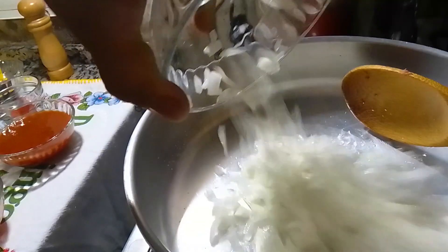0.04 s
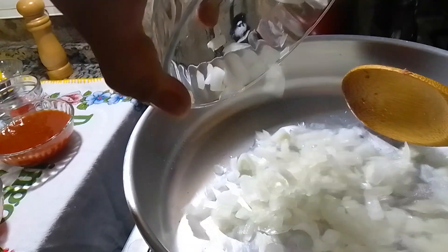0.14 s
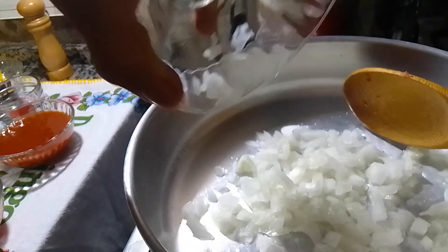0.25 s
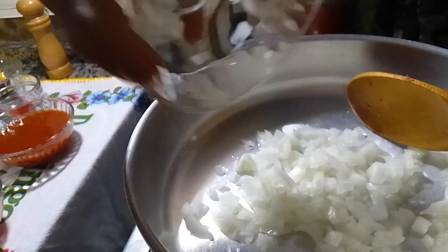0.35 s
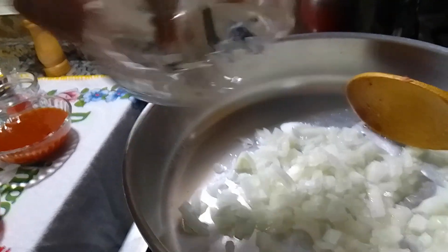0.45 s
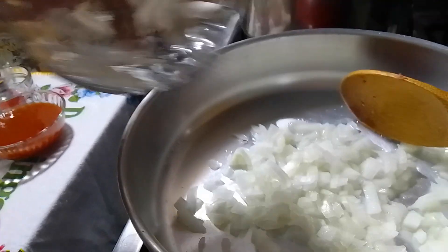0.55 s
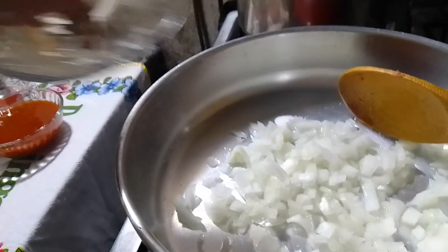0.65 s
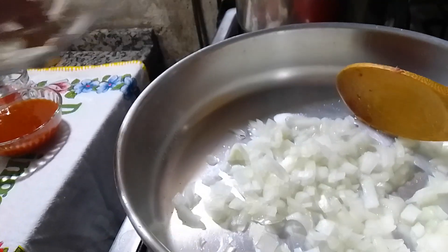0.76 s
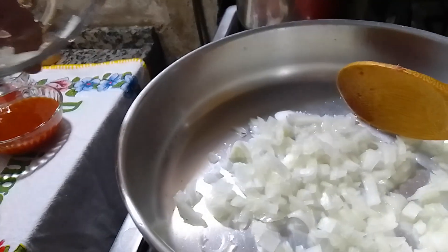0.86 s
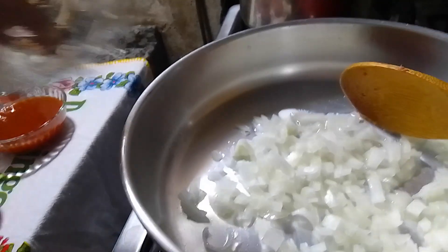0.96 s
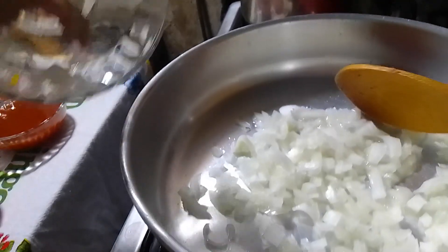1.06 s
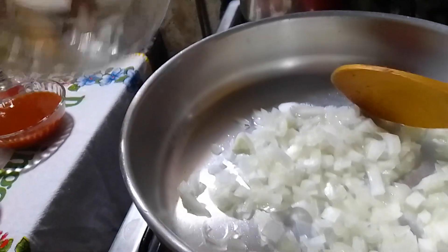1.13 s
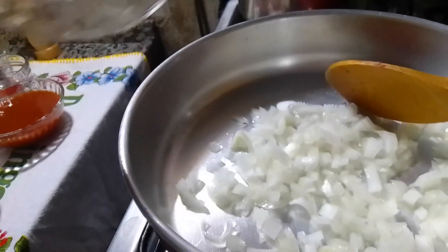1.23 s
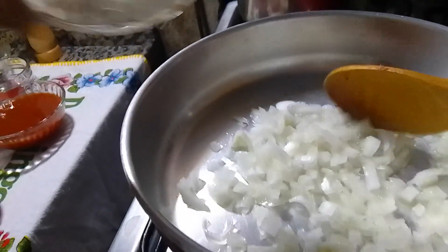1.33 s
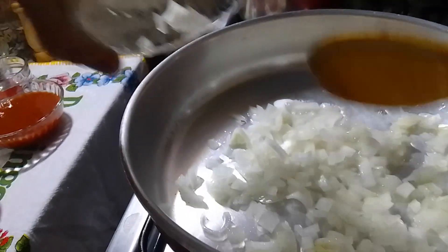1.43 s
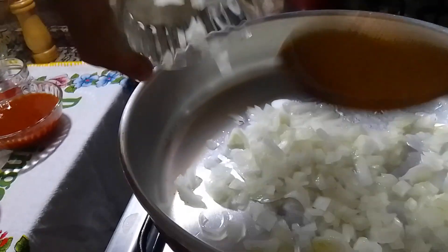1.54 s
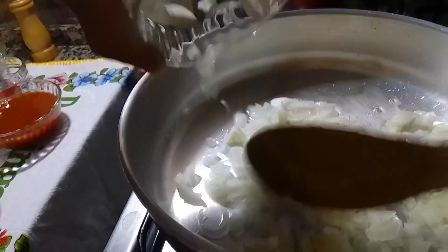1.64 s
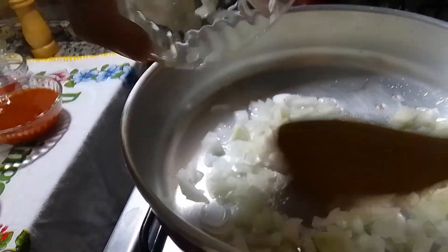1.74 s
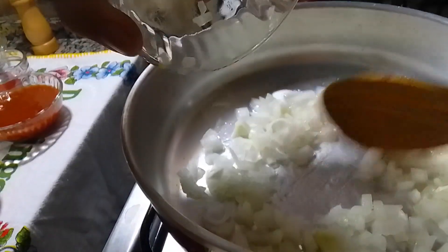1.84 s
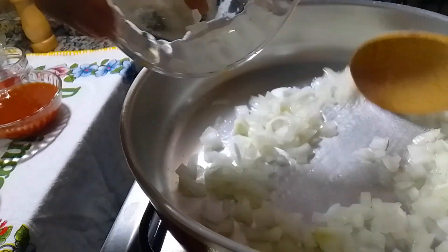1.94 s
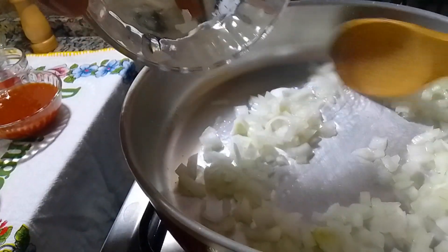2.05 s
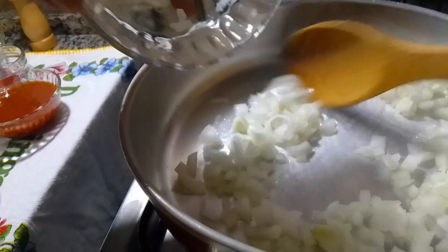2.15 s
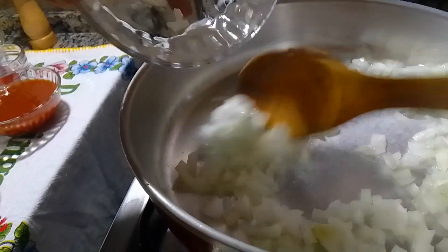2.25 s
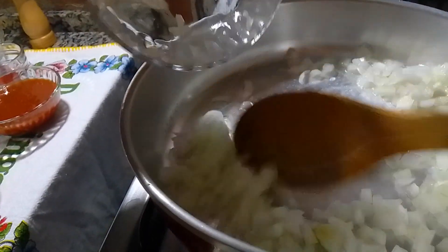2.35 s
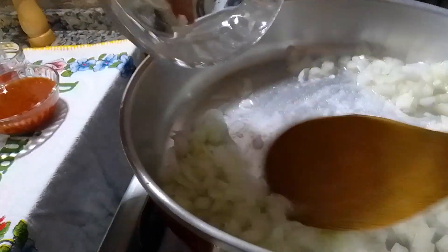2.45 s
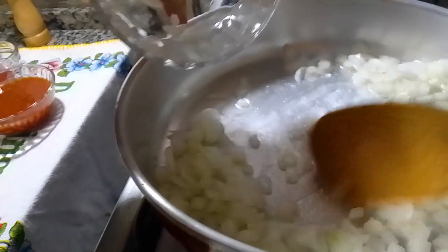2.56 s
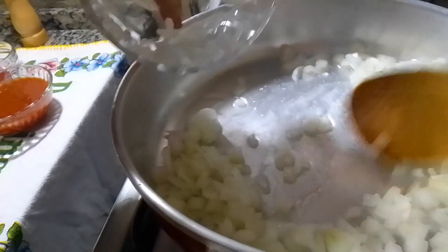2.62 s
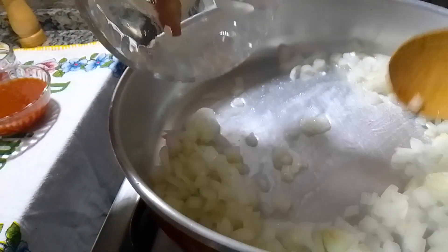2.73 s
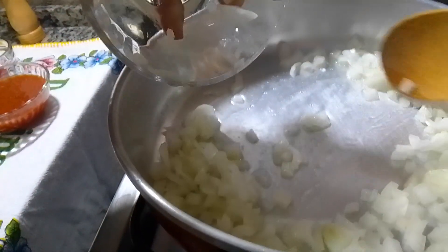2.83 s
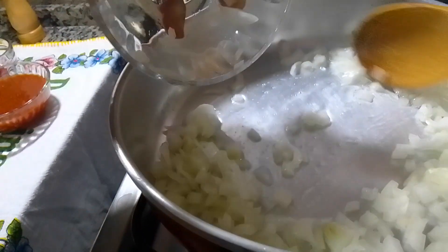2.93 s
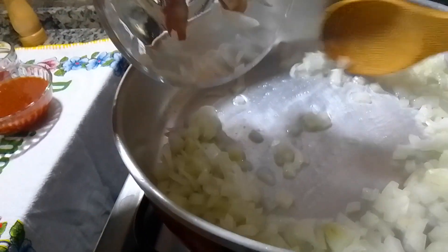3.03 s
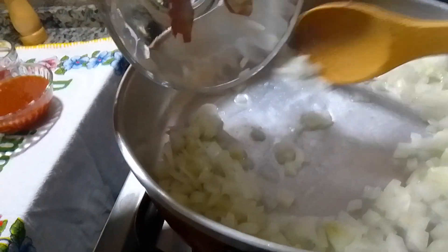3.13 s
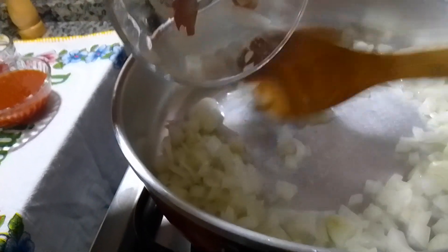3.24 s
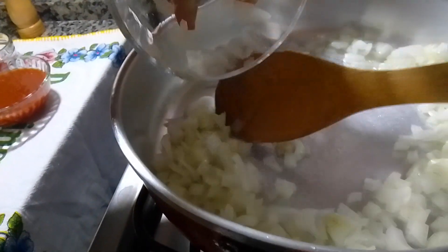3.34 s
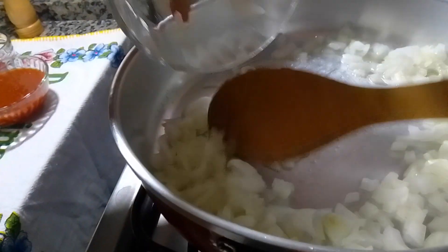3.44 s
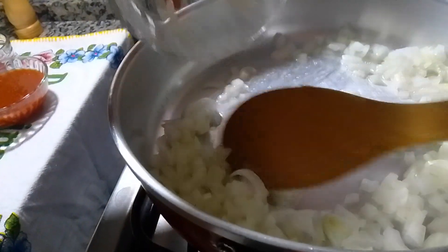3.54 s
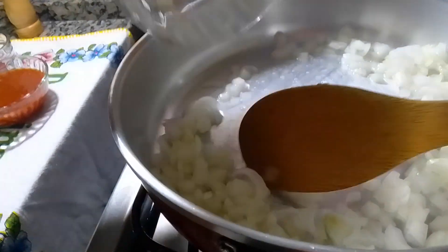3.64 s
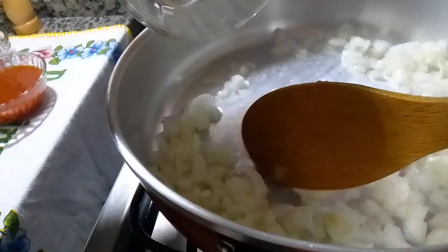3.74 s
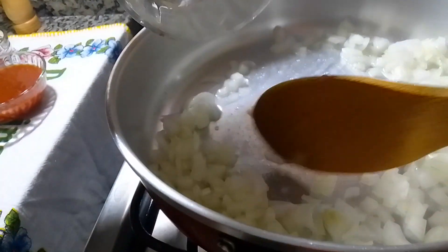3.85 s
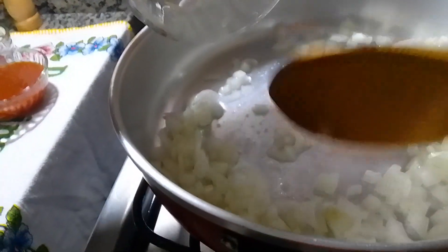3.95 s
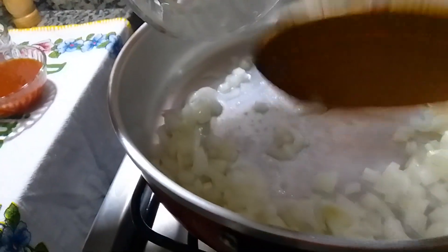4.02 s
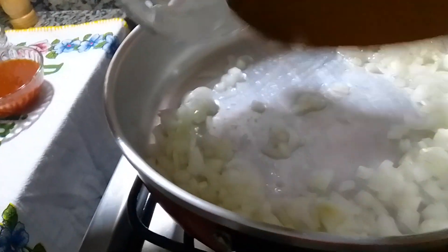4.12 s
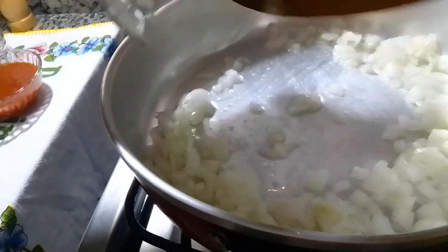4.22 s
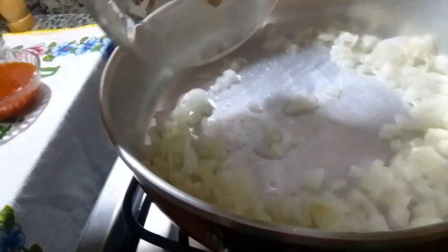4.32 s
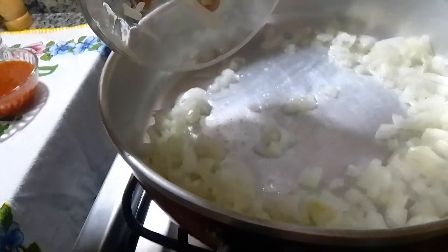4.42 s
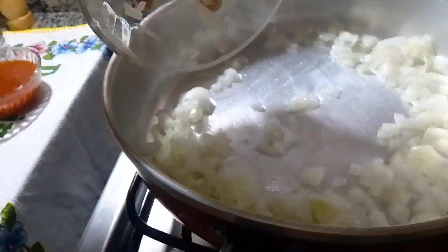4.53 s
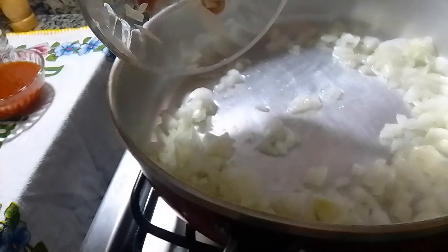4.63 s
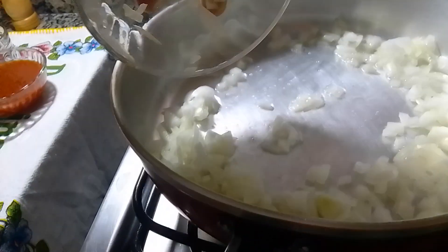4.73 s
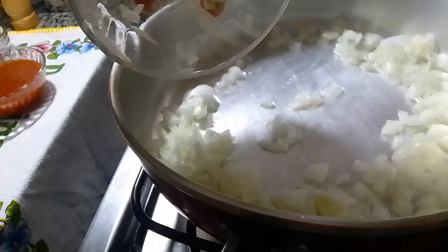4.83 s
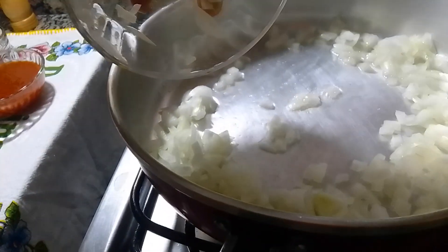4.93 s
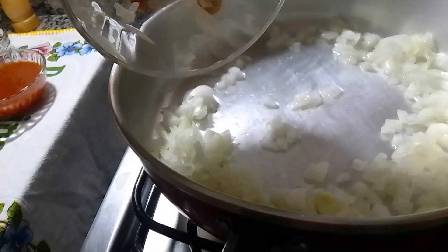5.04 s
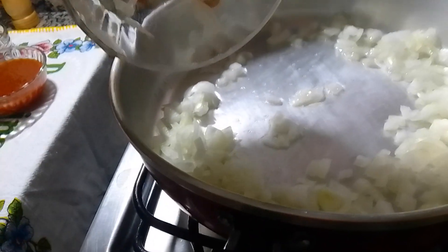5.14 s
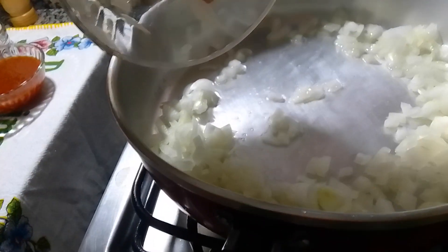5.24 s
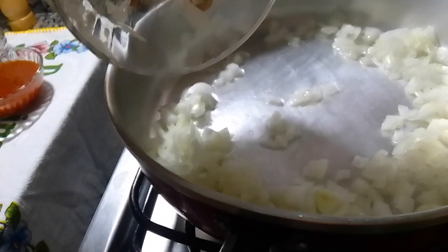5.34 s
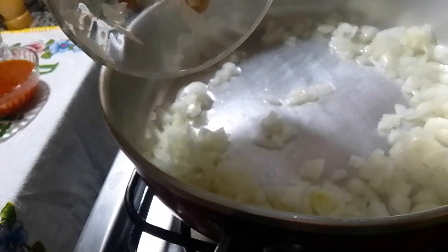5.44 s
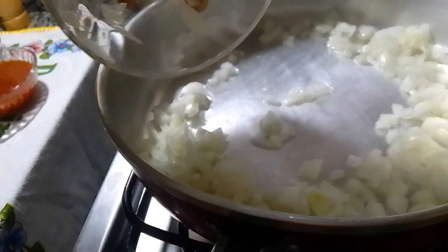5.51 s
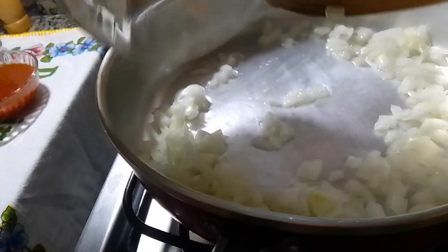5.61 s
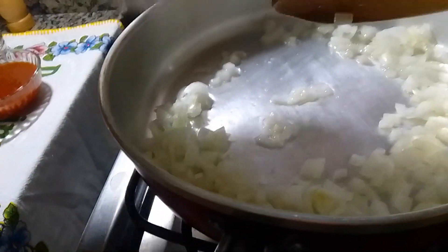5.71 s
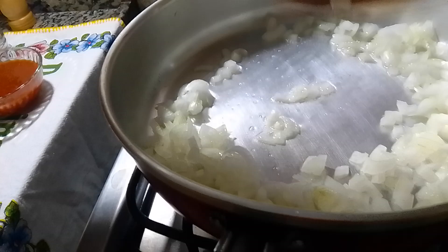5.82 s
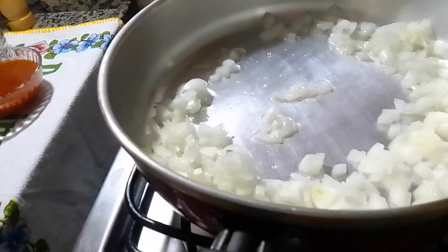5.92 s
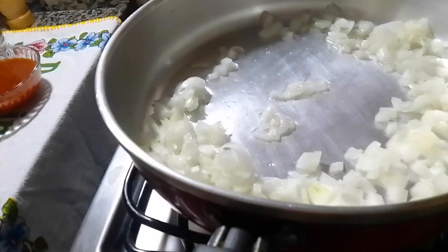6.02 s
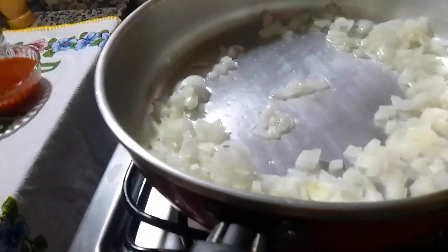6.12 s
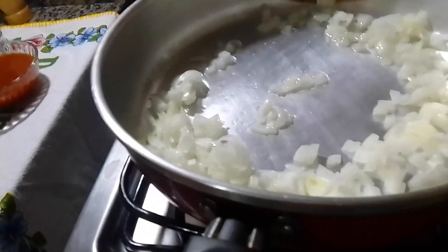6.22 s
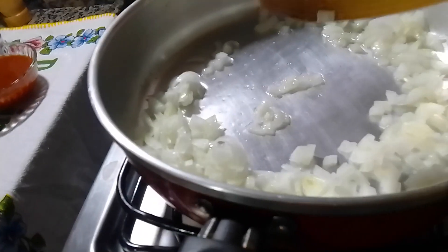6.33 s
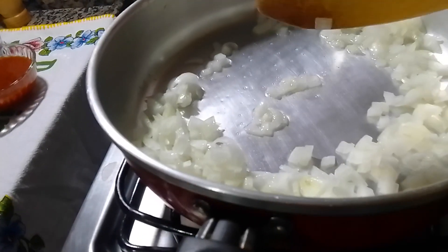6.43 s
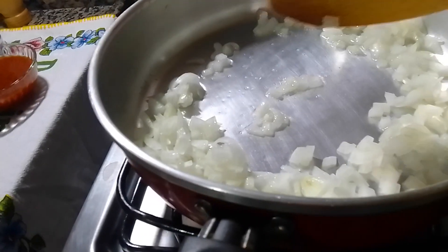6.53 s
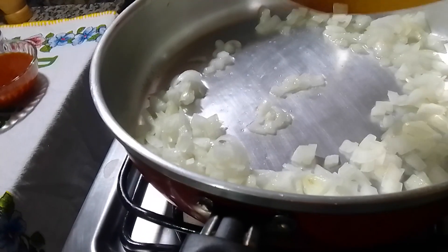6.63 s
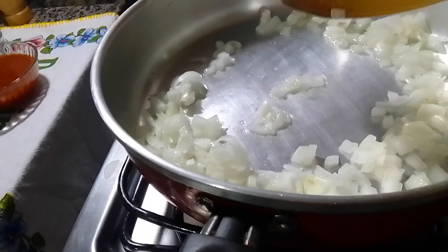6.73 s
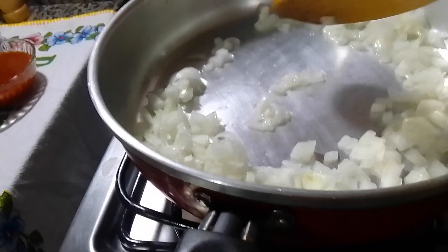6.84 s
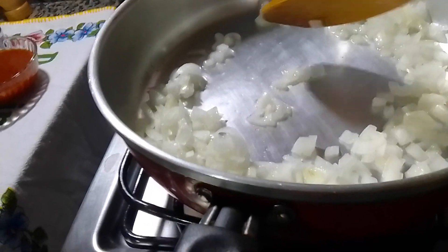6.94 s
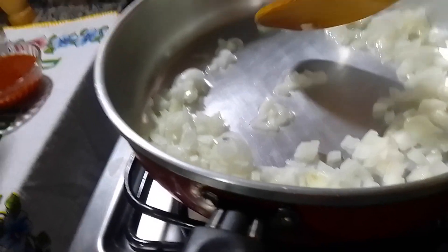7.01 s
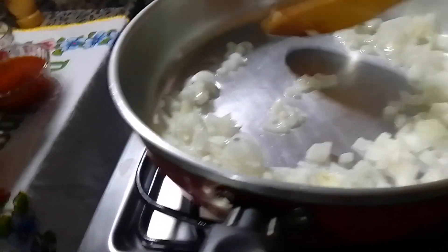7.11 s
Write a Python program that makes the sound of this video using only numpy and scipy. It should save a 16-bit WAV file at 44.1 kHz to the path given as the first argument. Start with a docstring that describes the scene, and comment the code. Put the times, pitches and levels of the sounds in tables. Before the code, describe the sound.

A close, bright sizzle of onion in a frying pan flares as a wooden spoon knocks and stirs, then fades to crackling.

```python
"""Chopped onion is tipped from a glass bowl into hot oil in a steel frying pan, close to a mono microphone.
First the bowl and onion knock on the pan, and countless tiny steam bursts start to sizzle.
Wet pieces plop, and the sizzle flares up as a wooden spoon knocks on the pan and spreads the onion.
Then kitchenware clacks once, and the frying eases off into single pops.
All along, a small kitchen answers with a short echo."""
import sys
import numpy as np
from scipy import signal
from scipy.fft import rfft, irfft, next_fast_len
from scipy.io import wavfile
from scipy.ndimage import uniform_filter1d, minimum_filter1d, map_coordinates

SR = 44100
rng = np.random.default_rng(int(sys.argv[2]) if len(sys.argv) > 2 else 0)


def dump_mix(stems):
    """Bounce the given channels to the path in sys.argv[1] as a 16-bit WAV at rate SR."""
    frames = np.atleast_2d(stems).T  # one column per channel
    limited = np.clip(frames, -1, 1)  # hard clip at full scale
    pcm = np.round(limited * 32767).astype(np.int16)
    wavfile.write(sys.argv[1], SR, pcm)


N = 316195

# tone colour of the fine sizzle, including the microphone's bright peak near 9 kHz: pitch_hz, level_db
FINE_COLOUR = [(2500, -64), (4500, -24.5), (5600, -18.5), (6800, -10.5), (7800, -5.5), (8800, 0),
               (9700, -1.5), (11000, -7.5), (12800, -12), (15500, -14.5)]
# tone colours of coarse bursts and of bubbles: pitch_hz, level_db
COARSE_COLOUR = [(300, -40), (900, -11.5), (1300, -8.5), (1650, -6.5), (2100, -4), (3300, -0.5),
                 (4300, -0.5), (5500, 0), (8000, -5), (15000, -32)]
BUBBLE_COLOUR = [(25, -41), (85, -16.5), (140, -7.5), (220, -0.5), (370, 2.5), (600, 0.5), (850, 4),
                 (1200, -5.5), (2000, -2), (5000, -39)]
# how much the bowl and spoon cover the pan: time_s, share (0 to 1)
PAN_COVER = [(0, .65), (1.75, .45), (2.2, .95), (2.7, .35), (3.35, .8), (3.65, .15), (4.3, .1), (4.55, 1),
             (5.1, .95), (5.3, .05), (6.45, .1), (7.17, .95)]
# wet onion meets hot metal, tipped in, then spread three times: start_s, sizzle_db, rise_s, gurgle_db
WET_ONION = [(0.046, -6, 0.12, -30), (1.70, -12.5, 0.21, -39), (2.43, -16, 0.15, -45),
             (3.22, -28.5, 0.12, -45.5)]

MODERATE_DB = -18  # the frying level of a moderate sizzle
SPATTER_START_S, PLOPS_END_S = .5, 4.6  # random pops and plops begin; random plops end


def frying_level():
    """Level in dB: wet onion adds a quick flash of steam and a long simmer to the oil's own sizzle."""
    oil_db, simmer_db = -26, -8.5
    power = amp(oil_db) ** 2
    for start_s, sizzle_db, rise_s, _ in WET_ONION:
        flash = surge(start_s, rise_s, fall_s=0.21)
        simmer = amp(simmer_db) ** 2 * surge(start_s, rise_s, fall_s=1.8)
        power = power + amp(sizzle_db) ** 2 * (flash + simmer)
    return 10 * np.log10(power)


def sizzle(level_db):
    """Steam bursts in the oil: as the frying eases they get fewer and stand out singly."""
    per_s = 5000 * amp(.8 * (level_db - MODERATE_DB))
    # bursts set each other off in small clusters
    clusters_db = 1.02 * wobble(330) + 0.44 * wobble(45) + 0.21 * wobble(14)
    shared = bursts(per_s, spread_db=4.0)
    fine = coloured(shared + amp(-0.5) * rng.standard_normal(N), FINE_COLOUR)
    coarse = amp(-4) * shared + bursts(per_s, spread_db=4.8) + amp(1) * rng.standard_normal(N)
    coarse = pan_air(coloured(coarse, COARSE_COLOUR))
    # the sizzle's tone colour drifts slightly in random patches
    fine = unit(drifting(fine, patchy_db=1.34))
    coarse = unit(drifting(coarse, patchy_db=1.62))
    # bowl and spoon throw some sound back, so less gets out
    cover = cover_share()
    extra_cover = cover - cover.mean()
    fine *= amp(-0.1 * extra_cover)
    coarse *= amp(-16.5 - 1.6 * extra_cover)
    return amp(level_db + clusters_db) * (fine + coarse)


def pops(level_db):
    """Single droplets explode: a snap, a spray and quick bounces around the pan, over a lower crack."""
    # the biggest droplets, before the pan's air colours them: start_s, snap_db, crack_db
    big = [(.871, -2, -18), (1.0765, -2, -20), (2.843, -3, -15), (3.395, -3, -22), (3.784, -4, -24),
           (4.296, -6, -20), (6.2805, -3.5, -8), (6.4273, -5, -28), (6.8154, -8.5, -22), (6.947, -7, -26)]
    # the pan's floor and wall repeat a pop: delay_s, level_db
    bounces = [(.0005, -5), (.0011, -10), (.0018, -4)]
    # tone colour of the crack: pitch_hz, level_db
    crack_colour = [(500, -28), (1500, -14), (2700, -2), (6000, 0), (15000, -4)]
    out = np.zeros(N)
    small = [(s, db + 12.5, db - 4) for s, db in random_events(SPATTER_START_S, N / SR, level_db, per_s=2.5)]
    for start_s, snap_db, crack_db in list(big) + small:
        snap = puff(fade_s=.006, spray_db=5)
        for delay_s, bounce_db in bounces:
            snap[round(delay_s * SR)] += amp(bounce_db)
        add(out, start_s, coloured(snap, FINE_COLOUR), snap_db)
        add(out, start_s, coloured(puff(fade_s=.008, spray_db=5), crack_colour), crack_db)
    return pan_air(out)


def plops(level_db):
    """Wet pieces drop or settle: each makes a low slap and a spit of oil."""
    # the biggest pieces, before the pan's air colours them: start_s, slap_db, spit_db
    big = [(.433, -21, -11), (.677, -21, -15), (.803, -24, -18), (.874, -26, -9.5), (1.077, -25, -24),
           (1.306, -27, -16), (1.844, -18, -17), (2.056, -22.5, -18), (2.166, -25, -15.5),
           (2.230, -30, -23), (2.473, -38, -15), (2.807, -26, -18), (3.215, -33, -24), (3.326, -24, -27),
           (3.632, -32, -19.5), (3.831, -39, -21), (4.374, -50, -32), (4.596, -38, -18)]
    out = np.zeros(N)
    settling = random_events(SPATTER_START_S, PLOPS_END_S, level_db, per_s=3)
    small = [(s, db - 18, db - 4) for s, db in settling]
    for start_s, slap_db, spit_db in list(big) + small:
        add(out, start_s, coloured(puff(fade_s=0.018, spray_db=-1.5), BUBBLE_COLOUR), slap_db)
        add(out, start_s, coloured(puff(fade_s=.028, spray_db=12), COARSE_COLOUR), spit_db)
    return pan_air(out)


def knocks():
    """Each blow thuds, makes the pan ring and rattles on in ever quicker, weaker bounces."""
    # bowl, onion and spoon hit the pan: start_s, thud_db, thud_hz, ring_db, ring_hz, bounce_loss_db
    blows = [(.009, -36, 776, -28, 776, 16), (.061, -23, 620, -18, 570, 7), (.066, -16, 1150, -19, 950, 2),
             (1.708, -32, 200, -39, 180, 14), (1.751, -17.5, 1100, -24, 380, 11),
             (3.215, -22.5, 800, -32, 700, 3), (3.224, -33, 290, -33, 240, 7),
             (3.323, -23.5, 900, -37, 850, 5.5), (4.489, -35, 288, -49, 288, 20)]
    first_gap_s, gap_shrink = .023, .8
    out = np.zeros(N)
    for start_s, thud_db, thud_hz, ring_db, ring_hz, bounce_loss_db in blows:
        for bounce in range(4):
            ring = soft_contact(pan_ring(), ring_hz)
            thud = soft_contact(puff(fade_s=0.031, spray_db=0), thud_hz)
            add(out, start_s, ring, ring_db - bounce * bounce_loss_db)
            add(out, start_s, thud, thud_db - bounce * bounce_loss_db)
            start_s += first_gap_s * gap_shrink ** bounce
    return out


def bubbling(level_db):
    """Trapped steam gurgles under the wet heap, most just after it moves, and the pan rings faintly."""
    steady = amp(-51.5 + 0.58 * (level_db - MODERATE_DB)) ** 2
    escaping = sum(amp(db) ** 2 * surge(s, rise_s=0.1, fall_s=0.18) for s, _, _, db in WET_ONION)
    pockets = bursts(per_s=900, spread_db=4.5) + amp(-1.5) * rng.standard_normal(N)
    gurgle = unit(coloured(pockets, BUBBLE_COLOUR))
    ringing = unit(signal.fftconvolve(gurgle, pan_ring())[:N])
    return np.sqrt(steady + escaping) * (gurgle + amp(-12.5) * ringing)


def clack():
    """A piece of kitchenware is touched and rings briefly."""
    # its ringing tones: pitch_hz, level_db, fade_s
    tones = [(900, -6, 0.057), (1076, -4, 0.09), (1250, -11, .04), (1630, 0, 0.027), (2100, -4, 0.024),
             (2880, -21, .05)]
    out, t = np.zeros(N), np.arange(SR // 4) / SR
    ring = sum((-1) ** k * amp(db) * fade(t, fade_s) * np.sin(2 * np.pi * hz * t)
               for k, (hz, db, fade_s) in enumerate(tones))
    onset = 1 - np.exp(-t / .0008)
    add(out, start_s=5.163, sound=ring * onset, peak_db=-28)
    return out


def pan_ring():
    """The struck steel rings with many tones, their strengths a little different each time."""
    # the pan's tones: pitch_hz, level_db, fade_s
    tones = [(161, 0, 0.11), (233, -2.5, 0.16), (361, -15.5, 0.19), (480, 1, 0.13), (610.6, -3, 0.18),
             (748, 2, 0.15), (823, -4.5, 0.1), (911, 2, 0.074), (1138, -10, 0.076), (1288, 7, 0.1),
             (1650, 9, 0.12), (2016, 11, .15), (2750, 14, 0.22)]
    t = np.arange(SR // 3) / SR
    hz, db, fade_s = np.transpose(tones)[:, :, None]
    strength = amp(db + rng.standard_normal(hz.shape)) * rng.choice([-1, 1], hz.shape)
    return np.sum(strength * fade(t, fade_s) * np.sin(2 * np.pi * hz * t), axis=0)


def pan_air(sound):
    """The air in the pan lifts a few pitches; which ones depends on how far it is covered."""
    # bands that the air adds: pitch_hz, width_hz, open_db, covered_db
    bands = [(1353, 120, 2, 5), (1970, 390, -26, 0.5), (2860, 150, 0.5, -38), (4110, 150, -18, -1)]
    cover = cover_share()
    out = sound.copy()
    for hz, width_hz, open_db, covered_db in bands:
        band = filtered(sound, lambda f: 1j * f * width_hz / (hz * hz - f * f + 1j * f * width_hz))
        out += band * ((1 - cover) * amp(open_db) + cover * amp(covered_db))
    return out


def kitchen_echo(sound, fade_s):
    """The kitchen answers with a short, blurred echo."""
    t = np.arange(SR // 2) / SR
    tail = rng.standard_normal(len(t)) * fade(t, fade_s) * (t > .003)
    return signal.fftconvolve(sound, tail / np.linalg.norm(tail))[:N]


def kitchen_noise():
    """The faint, low noise of a quiet kitchen."""
    # its tone colour: pitch_hz, level_db
    colour = [(25, -22), (85, -30), (140, -1), (240, 1.5), (500, -4), (1000, -5), (4000, -22)]
    return amp(-64.5) * unit(coloured(rng.standard_normal(N), colour))


def cover_share():
    """How far the pan is covered at each sample, from 0 to 1."""
    time_s, share = np.transpose(PAN_COVER)
    return np.clip(np.interp(np.arange(N) / SR, time_s, share), 0, 1)


def bursts(per_s, spread_db):
    """Tiny clicks at random times and in random sizes."""
    size = amp(spread_db * np.clip(rng.standard_normal(N), -3, 2.5))
    return unit((rng.random(N) < per_s / SR) * size * rng.choice([-1, 1], N))


def puff(fade_s, spray_db, size=4096):
    """A sudden snap followed by a short dying spray."""
    spray = rng.standard_normal(size) * fade(np.arange(size) / SR, fade_s)
    return signal.unit_impulse(size) + amp(spray_db) * spray / np.linalg.norm(spray)


def random_events(start_s, end_s, level_db, per_s, scatter_db=1.5):
    """Random pairs of time_s, level_db that follow the frying level."""
    count = int(per_s * (end_s - start_s))
    place, size = rng.random((count, 2)).T
    time_s = start_s + (np.arange(count) + place) / count * (end_s - start_s)
    return zip(time_s, np.interp(time_s * SR, np.arange(N), level_db) + scatter_db * (2 * size - 1))


def surge(start_s, rise_s, fall_s):
    """Power that builds up and dies away."""
    age_s = np.maximum(np.arange(N) / SR - start_s, 0)
    return (1 - np.exp(-age_s / rise_s)) ** 2 * np.exp(-age_s / fall_s)


def wobble(per_s):
    """A smooth curve through per_s random points a second."""
    return map_coordinates(rng.standard_normal(int(N * per_s / SR) + 4), [np.arange(N) * per_s / SR])


def drifting(sound, patchy_db, size=512):
    """Let the tone colour drift in random patches of pitch and time."""
    spectrum = signal.stft(sound, nperseg=size)[2]
    patches = uniform_filter1d(rng.standard_normal(spectrum.shape), size=4, axis=0)
    patches = uniform_filter1d(patches, size=36, axis=1)
    return signal.istft(spectrum * amp(patchy_db * unit(patches)), nperseg=size)[1][:N]


def soft_contact(sound, hz):
    """A soft contact favours one pitch and dulls the rest."""
    return coloured(sound, [(hz / 8, -38), (hz / 2, -11), (hz, 0), (hz * 2, -14), (hz * 6, -34)])


def coloured(sound, colour, size=4096):
    """Give a sound a tone colour: rows of pitch_hz, level_db say how strong each pitch is."""
    hz, db = np.transpose(colour)
    grid_hz = np.fft.rfftfreq(size, 1 / SR)
    gain = amp(np.interp(np.log(grid_hz + 1), np.log(hz), db))
    # fold the filter forward in time, so nothing rings before a hit
    folded = irfft(np.log(gain))
    folded[1:size // 2] *= 2
    folded[size // 2 + 1:] = 0
    return signal.fftconvolve(sound, irfft(np.exp(rfft(folded))))[:len(sound)]


def filtered(sound, response):
    """Multiply each pitch in the sound by response(hz)."""
    size = next_fast_len(len(sound) + SR // 2)
    return irfft(rfft(sound, size) * response(np.fft.rfftfreq(size, 1 / SR)), size)[:len(sound)]


def add(track, start_s, sound, peak_db):
    """Mix a sound into the track with its peak at peak_db."""
    part = track[max(round(start_s * SR), 0):][:len(sound)]
    part += amp(peak_db) * sound[:len(part)] / np.abs(sound).max()


def fade(t, fade_s):
    """A level that falls by 60 dB in fade_s seconds."""
    return amp(-60 * t / fade_s)


def amp(db):
    """Turn decibels into a plain multiplier."""
    return 10 ** (np.asarray(db) / 20)


def unit(sound):
    """Scale a sound to an average (rms) level of 1."""
    return sound / np.sqrt(np.mean(sound ** 2) + 1e-20)


def scene():
    """Frying and knocks in a small, quiet kitchen, the same in both channels."""
    level_db = frying_level()
    frying = sizzle(level_db) + bubbling(level_db)
    background = kitchen_noise()
    hits = knocks() + clack() + pops(level_db) + plops(level_db)
    echo = kitchen_echo(amp(-16) * frying + amp(-14) * hits, fade_s=0.11)
    mono = frying + hits + echo + background
    return np.array([mono, mono])


def record(dry):
    """A fast limiter holds down the loudest peaks, and the highest treble is cut off."""
    ceiling, top_hz = .72, 15750
    needed = np.minimum(1, ceiling / (np.abs(dry) + 1e-9))
    gain = uniform_filter1d(minimum_filter1d(needed, size=21), size=21)
    return np.array([filtered(channel, lambda hz: hz < top_hz) for channel in dry * gain])


dry = scene()
out = record(dry)
dump_mix(out)
```